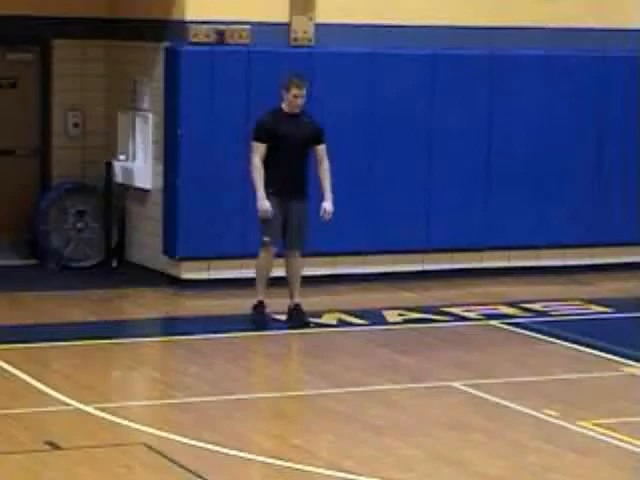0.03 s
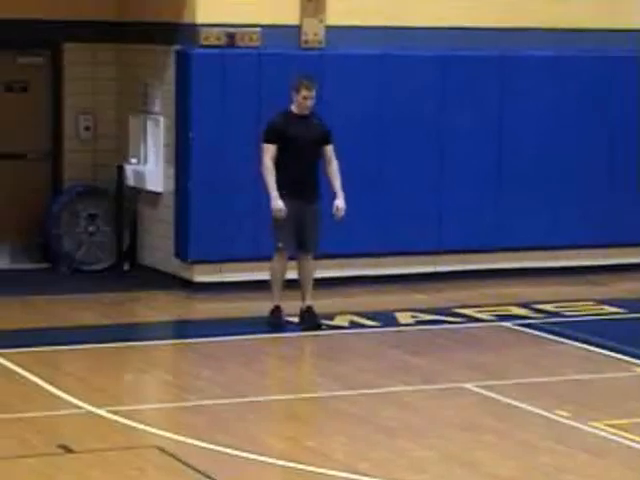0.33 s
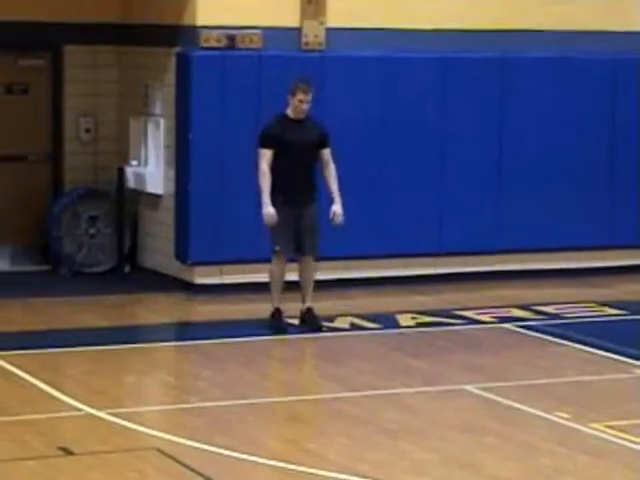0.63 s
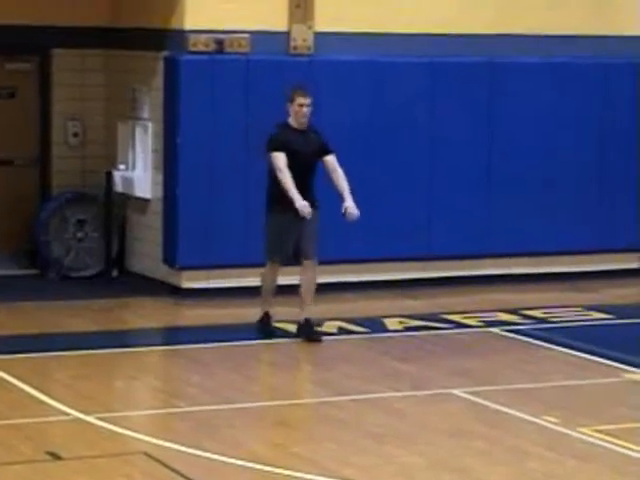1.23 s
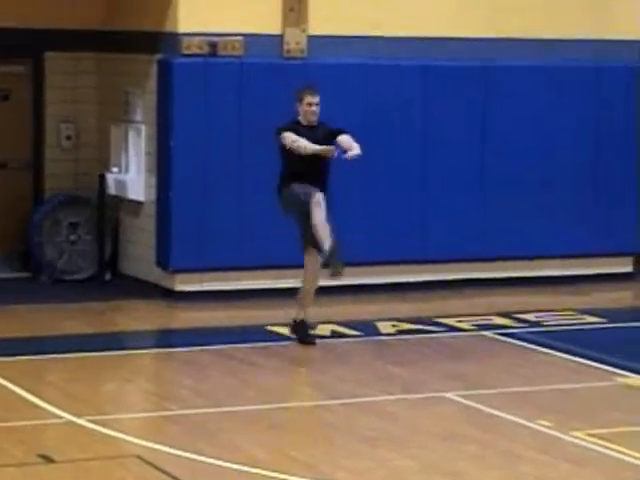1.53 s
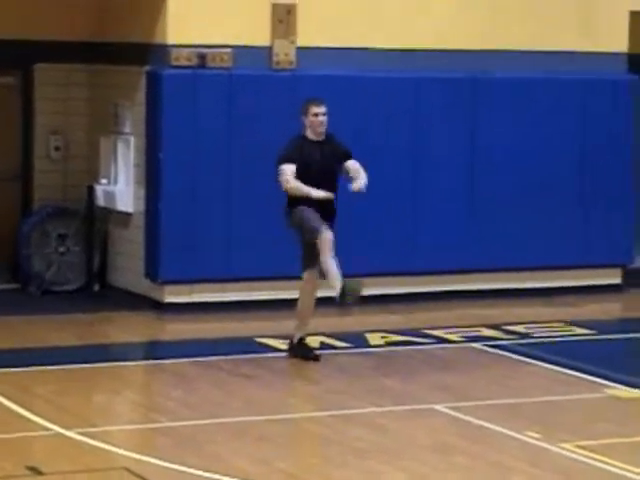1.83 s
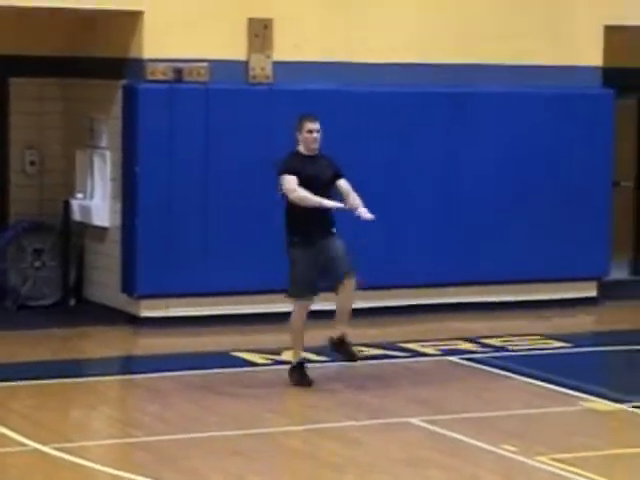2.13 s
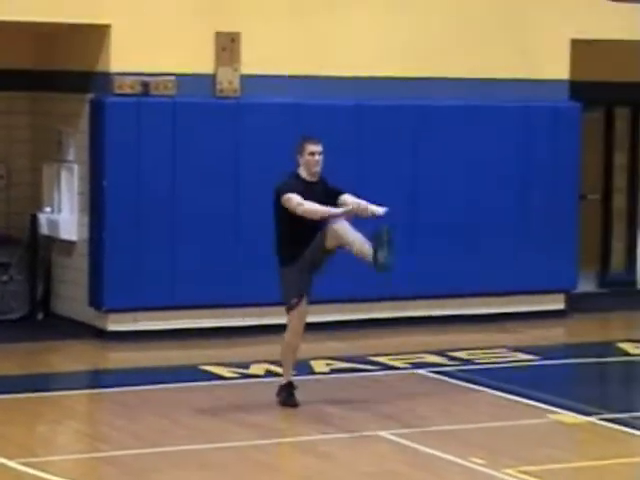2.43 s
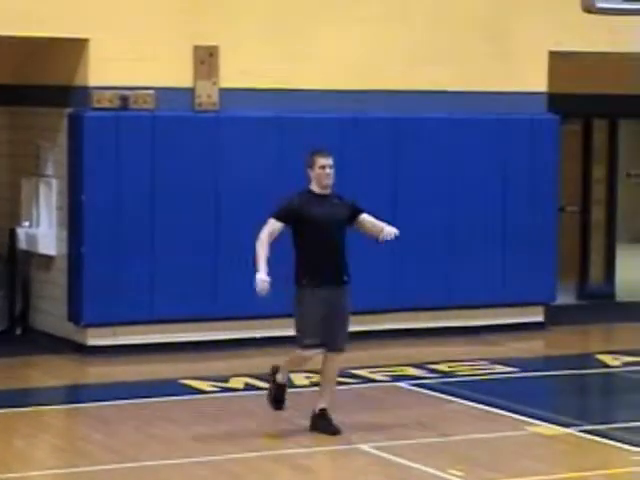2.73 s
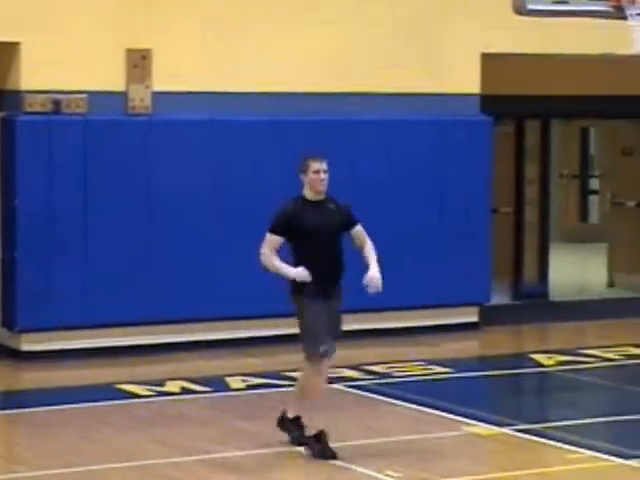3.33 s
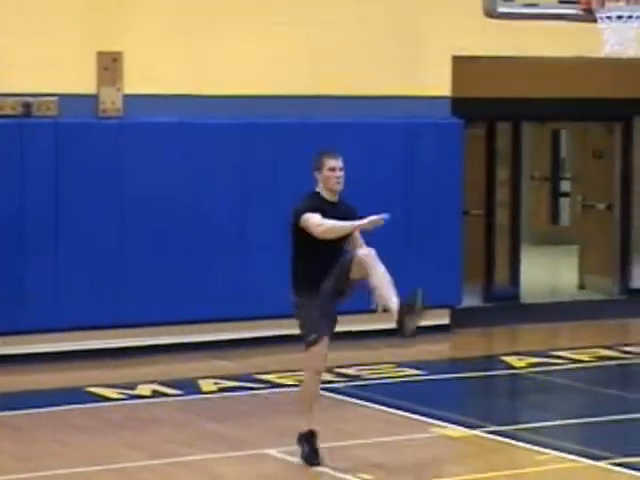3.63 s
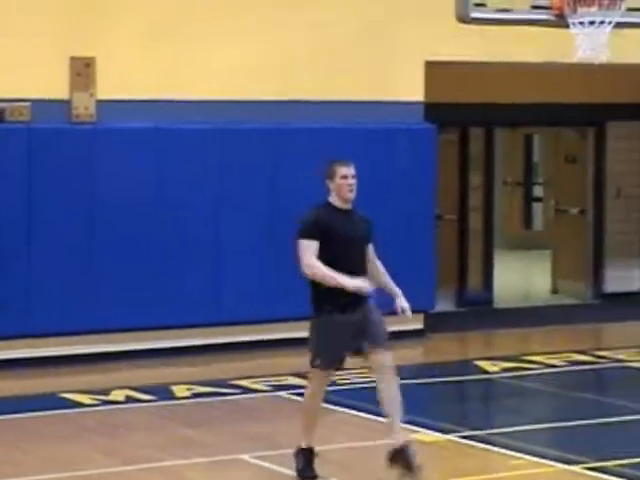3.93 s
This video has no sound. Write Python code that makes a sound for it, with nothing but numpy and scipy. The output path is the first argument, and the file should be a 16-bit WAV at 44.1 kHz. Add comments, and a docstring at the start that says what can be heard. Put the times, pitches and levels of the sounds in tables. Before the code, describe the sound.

Shoes thud and squeak on a wooden gym floor as a person skips and kicks.

```python
"""Skips and kicks in a gym

A big, echoing hall with a sprung wooden floor; a close pair of microphones stands some metres away.
A person skips and kicks: each landing is a quick pair of sole slaps that set the boards booming,
and rubber squeaks on the push-offs. Behind, ceiling lamps hum on the mains and air rushes faintly."""
import sys
import numpy as np
from scipy import signal
from scipy.fft import rfft, irfft, next_fast_len
from scipy.io import wavfile
from scipy.ndimage import map_coordinates

SR = 44100
rng = np.random.default_rng(int(sys.argv[2]) if len(sys.argv) > 2 else 0)


def generate_wav(sig):
    """Save sig (samples, or channels by samples) to the path in sys.argv[1] as 16-bit PCM at SR."""
    pcm = np.round(np.clip(np.atleast_2d(sig).T, -1, 1) * 32767).astype(np.int16)
    wavfile.write(sys.argv[1], SR, pcm)


N = 176400

# Ventilation colour: frequency_hz, gain_db
AIR_COLOUR = [(25, -4), (48, -16.5), (70, -5), (120, -6), (170, -7.5), (300, -9), (500, -15.5),
              (750, -15.5), (1200, -21), (2300, -21), (3600, -28.5), (5500, -30.5), (8000, -33)]
# Strong partials of the lamps: mains_multiple, level_db
HUM_PARTIALS = [(2, -49), (4, -62), (6, -55), (10, -63), (12, -55), (14, -60), (16, -66), (18, -60),
                (20, -54), (28, -65), (30, -59), (32, -66), (34, -66), (38, -62), (40, -62), (42, -67),
                (44, -71), (48, -69), (50, -63), (52, -66), (56, -70), (60, -71), (70, -68), (72, -73),
                (74, -70), (78, -66), (80, -67), (88, -68), (92, -76), (94, -69), (98, -72), (102, -76),
                (106, -74), (116, -76), (118, -71), (122, -73)]
# Contour of the weak partials around them: frequency_hz, level_db
BUZZ_CONTOUR = [(200, -66), (1200, -71.5), (2400, -74), (4000, -78), (5500, -73.5), (7300, -97),
                (8000, -84.5)]
# Shoes and clothes rubbing: start_s, length_s, level_db, tilt_db_per_octave
RUBS = [(0.274, .1, -47, -0.5), (.36, 0.51, -51.5, -6), (1.15, 0.54, -55, 3), (1.41, 0.14, -47, -3),
        (1.816, 0.21, -46.5, 4.5)]
# Rubbing colour: frequency_hz, gain_db
RUB_COLOUR = [(60, -7), (250, 0), (420, -8), (550, -5), (900, -6), (2500, -12.5), (3300, -15), (4200, -34),
              (8000, -46)]
# Rubber slipping: start_s, length_s, level_db, start_hz, end_hz, waver_share, wall_echo_db
RUBBER_SLIPS = [(1.839, 0.024, -40, 3750, 3455, 0.045, -4), (2.505, 0.014, -13, 3150, 3000, 0.022, -7.5),
                (3.2045, 0.0035, -16, 3040, 2760, 0.0096, -4.5),
                (3.2093, 0.004, -22.5, 2940, 3100, 0.0083, -16),
                (3.237, 0.0058, -27, 2940, 2810, .012, -13), (3.8651, 0.013, -12.5, 2938, 3566, 0.037, -12),
                (3.88, .011, -9.5, 3145, 3090, .04, -7.5)]
# Feet landing: start_s, slap_db, roll_db (against the slap), boom_db, tilt_db_per_octave, knock_hz
FOOTFALLS = [(1.424, -30, -15, -34.5, -1.5, 195), (1.842, -22.5, 1.5, -35.5, 2, 1500),
             (1.868, -23.5, -7.5, -31.5, 0, 1480), (2.124, -17.5, 5.5, -38.5, -1.5, 760),
             (2.155, -14.5, -2.5, -21, -1, 227), (2.505, -36.5, 8, -28, -2, 265),
             (2.811, -10.5, -7, -33.5, 0.5, 1140), (2.847, -9, -12, -20, 0.5, 623),
             (3.194, -19.5, -6.5, -22, 1, 1700), (3.496, -12.5, 1.5, -30.5, -0.5, 1140),
             (3.537, -10.5, -3.5, -18, 0.5, 690)]
# Sole slap colour: frequency_hz, gain_db
SOLE_COLOUR = [(40, -28.5), (160, -3.5), (260, 0), (380, -1), (500, -3), (690, 0.5), (980, -6),
               (1250, -5.5), (2200, -8.5), (4000, -17), (6000, -25), (8000, -30.5)]
# Floor boom colour: frequency_hz, gain_db
BOARD_COLOUR = [(30, -14.5), (48, -13), (62, -5), (90, -2.5), (122, 1), (160, -11), (220, -9), (350, -11),
                (500, -26.5), (1500, -54.5)]
# Time the hall takes to die away by 60 dB: frequency_hz, decay_s
HALL_DECAY = [(60, 2.5), (160, 1.87), (500, 2.2), (1200, 2.36), (3000, 1.86), (7000, 0.88)]
# Right microphone's level over the left: frequency_hz, gain_db
RIGHT_OVER_LEFT = [(60, .1), (125, .5), (500, 2.4), (1500, 2), (3000, 4), (4500, 3), (7000, 2.8)]

TOP_HZ = 8000  # upper edge of the sound


def amp(db):
    """Decibels to amplitude."""
    return 10 ** (np.asarray(db) / 20)


def along(points, hz):
    """Read a (frequency, value) table on a log frequency axis."""
    frequencies, values = np.transpose(points)
    return np.interp(np.log(hz + 1), np.log(frequencies + 1), values)


def octaves(hz):
    """Octaves from 1 kHz, for tilting a colour."""
    return np.log2(np.clip(hz, 250, 8000) / 1000)


def wobble(rate, size):
    """A smooth random curve, rate knots a second."""
    knots = rng.standard_normal(int(size * rate / SR) + 4)
    return map_coordinates(knots, [np.arange(size) * rate / SR])


def filtered(x, gain):
    """x times a gain that depends on frequency."""
    size = x.shape[-1]
    padded = next_fast_len(size + 8192)
    return irfft(rfft(x, padded) * gain(np.fft.rfftfreq(padded, 1 / SR)), padded)[..., :size]


def noise(colour, shape, tilt_db=0):
    """Coloured noise of rms 1."""
    x = filtered(rng.standard_normal(shape), lambda hz: amp(along(colour, hz) + tilt_db * octaves(hz)))
    return x / np.sqrt(np.mean(x ** 2) + 1e-20)


def add(out, start_s, x):
    """Mix x in at start_s."""
    i = round(start_s * SR)
    out[:, i:i + x.shape[1]] += x[:, :N - i]


def diffuse(pair, side_db=-9):
    """Two unrelated signals as a diffuse field at two close microphones."""
    side = amp(side_db) * pair[1]
    return np.array([pair[0] + side, pair[0] - side])


def hall_echo(size=70000, early_db=-3, early_t60_s=0.64, build_s=0.0027):
    """A fresh stereo echo: near walls first, then the long ring of the hall."""
    hz, frame_s, spectra = signal.stft(rng.standard_normal((2, size)), SR, nperseg=256)
    decay = amp(-60 * frame_s / along(HALL_DECAY, hz)[:, None])
    late = signal.istft(spectra * decay, SR, nperseg=256)[1][:, :size]
    t = np.arange(size) / SR
    early = rng.standard_normal((2, size)) * amp(early_db - 60 * t / early_t60_s)
    tail = (late + early) * (1 - np.exp(-t / build_s))
    return diffuse(tail / np.linalg.norm(tail[0]))


def in_hall(x, wet_db, wall_db=-16.5, wall_s=0.0263):
    """A sound some metres off arrives direct, off the nearest wall and from the whole hall."""
    response = amp(wet_db) * hall_echo()
    response[:, 0] += 1
    response[:, round(wall_s * SR)] += amp(wall_db)
    return signal.fftconvolve(x[None], response, axes=1)


def ventilation(level_db=-48.5):
    """Air rushes steadily, all around the microphones."""
    return amp(level_db) * diffuse(noise(AIR_COLOUR, (2, N)))


def lamps(mains_hz=59.96, odd_db=-6.5, scatter_db=6, waver_db=1, tilt_db=-0.01):
    """Ballasts overhead hum on multiples of the mains, even ones strongest; each wavers slowly."""
    t, pair = np.arange(N) / SR, np.zeros((2, N))
    strong_db = {round(k): db for k, db in HUM_PARTIALS}
    knots_s = np.linspace(0, t[-1], num=12)
    for k in range(2, 132):
        hz = k * mains_hz
        weak_db = along(BUZZ_CONTOUR, hz) + odd_db * (k % 2) + scatter_db * rng.standard_normal()
        db = strong_db.get(k, weak_db) + tilt_db * octaves(hz)
        peaks = np.sqrt(2) * amp(db + waver_db * rng.standard_normal(len(knots_s)))
        phase = 2 * np.pi * (hz * t % 1 + rng.random((2, 1)))
        pair += np.interp(t, knots_s, peaks) * np.sin(phase)
    return diffuse(pair)


def rubbing():
    """Shoes and clothes rub in soft swells as the weight shifts around the first kick."""
    t, out = np.arange(N) / SR, np.zeros((2, N))
    for start_s, length_s, level_db, tilt_db in RUBS:
        swell = np.sin(np.pi * np.clip((t - start_s) / length_s, 0, 1))
        out += amp(level_db) * swell * diffuse(noise(RUB_COLOUR, (2, N), tilt_db))
    return out


def squeaks(edge_s=0.0016, flutter_db=1.2, settle_s=0.003, octave_db=-18, rasp_db=-37.5):
    """Rubber sticks and slips for milliseconds: a gliding, wavering tone with its octave."""
    t, out = np.arange(SR // 20) / SR, np.zeros((2, N))
    for start_s, length_s, level_db, start_hz, end_hz, waver, wall_db in RUBBER_SLIPS:
        hz = np.interp(t, [0, length_s], [start_hz, end_hz]) * (1 + waver * wobble(620, len(t)))
        tone = np.sin(2 * np.pi * np.cumsum(hz) / SR)
        grip = np.sin(np.pi / 2 * np.clip(np.minimum(t, length_s - t) / edge_s, 0, 1)) ** 2
        grip *= amp(level_db + flutter_db * wobble(280, len(t)))
        octave_hz = 2 * hz * (1 + 0.079 * np.exp(-t / settle_s))  # sharp as the rubber bites, then locks
        octave = amp(octave_db) * np.sin(2 * np.pi * np.cumsum(octave_hz) / SR)
        rasp = amp(rasp_db) * rng.standard_normal(len(t))
        add(out, start_s, in_hall(grip * tone, wet_db=-2.5, wall_db=wall_db))
        # The hall gives back less of the overtones.
        add(out, start_s, in_hall(grip * (octave + rasp), wet_db=-5, wall_db=wall_db - 2.5))
    return out


def board_boom(t, rise_s=0.037, decay_s=0.048, gain_db=1):
    """The sprung boards take the weight: a low boom swells and dies."""
    return amp(gain_db) * noise(BOARD_COLOUR, len(t)) * (1 - np.exp(-t / rise_s)) * np.exp(-t / decay_s)


def sole_click(tilt_db, knock_hz, knock_db=5.5, width_octaves=0.8, size=4096):
    """One contact, peak 1: a click with the hollow knock of air under the sole."""
    hz = np.fft.rfftfreq(size, 1 / SR)
    hump_db = knock_db * np.exp(-(np.log2((hz + 1) / knock_hz) / width_octaves) ** 2)
    colour = amp(along(SOLE_COLOUR, hz) + tilt_db * octaves(hz) + hump_db)
    cepstrum = irfft(np.log(colour / np.hypot(1, (hz / TOP_HZ) ** 10)))
    cepstrum[1:size // 2] *= 2  # minimum phase: nothing sounds before the contact
    cepstrum[size // 2 + 1:] = 0
    click = irfft(np.exp(rfft(cepstrum)))
    return click / np.abs(click).max()


def sole_slap(t, roll_db, tilt_db, knock_hz, roll_s=0.0032):
    """The sole strikes, then rolls flat into a second contact, with a brief patter and scuff."""
    patter = amp(-16) * np.exp(-t / 0.0055)
    scuff = amp(-38) * np.exp(-t / 0.0072)
    contact = rng.standard_normal(len(t)) * (patter + scuff) * (1 - np.exp(-t / roll_s))
    contact[0] += 1
    contact[round(roll_s * rng.uniform(0.8, 1.2) * SR)] += amp(roll_db)
    return signal.fftconvolve(contact, sole_click(tilt_db, knock_hz))


def footfalls():
    """Each foot slaps the floor and sets it booming; both ring through the hall."""
    t, out = np.arange(SR // 3) / SR, np.zeros((2, N))
    for start_s, slap_db, roll_db, boom_db, tilt_db, knock_hz in FOOTFALLS:
        slap = amp(slap_db) * sole_slap(t, roll_db, tilt_db, knock_hz)
        add(out, start_s, in_hall(slap, wet_db=-1))
        add(out, start_s, in_hall(amp(boom_db) * board_boom(t), wet_db=-0.5))
    return out


def scene():
    """One person out on the floor, over the steady sound of the hall."""
    return footfalls() + squeaks() + rubbing() + lamps() + ventilation()


def record(dry, mono_below_hz=480, start_s=0.164):
    """Two close microphones hear the bass alike; higher up the right one is a little louder."""
    mid = dry.mean(axis=0)
    side = filtered((dry[0] - dry[1]) / 2, lambda hz: (hz + 80) / np.hypot(hz + 80, mono_below_hz))
    pair = np.array([mid + side, mid - side])
    pair = filtered(pair, lambda hz: amp(np.outer([-1, 1], along(RIGHT_OVER_LEFT, hz) / 2)))
    fade_in = np.clip((np.arange(N) / SR - start_s) / 0.002, 0, 1)  # after a moment of silence
    return filtered(pair * fade_in, lambda hz: np.clip((TOP_HZ + 400 - hz) / 950, 0, 1) ** 2)


dry = scene()
out = record(dry)
generate_wav(out)
```